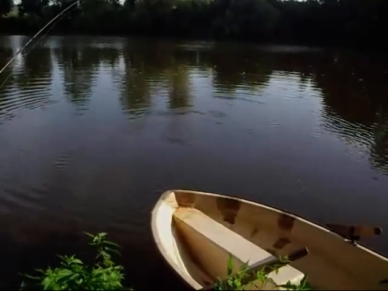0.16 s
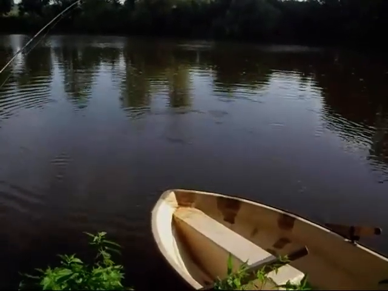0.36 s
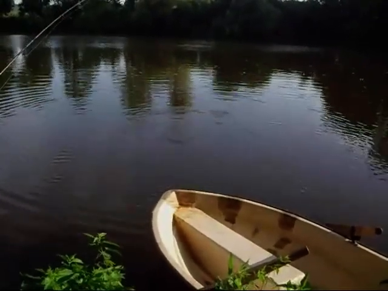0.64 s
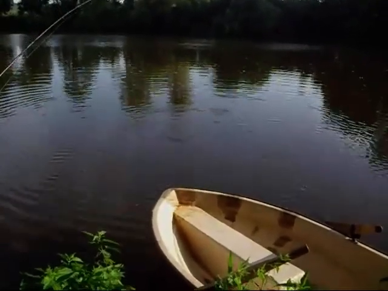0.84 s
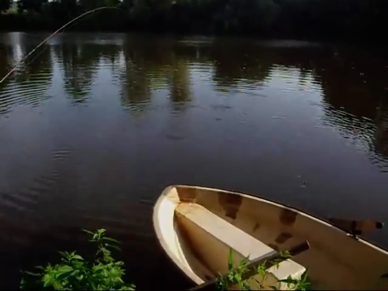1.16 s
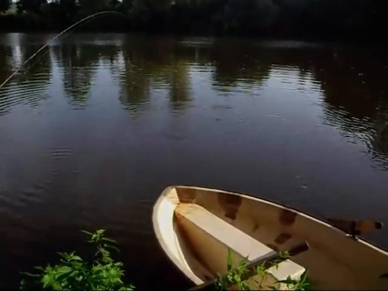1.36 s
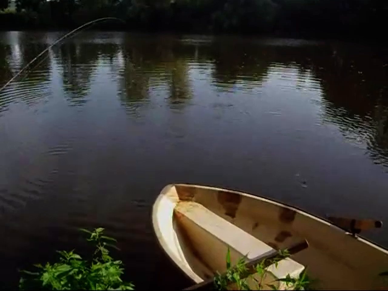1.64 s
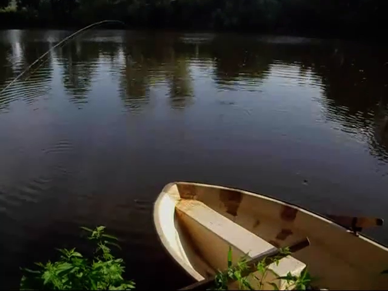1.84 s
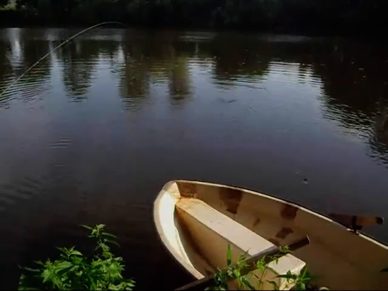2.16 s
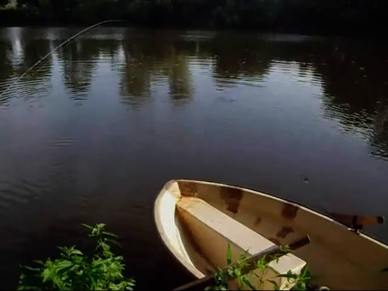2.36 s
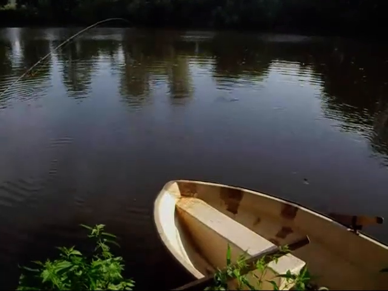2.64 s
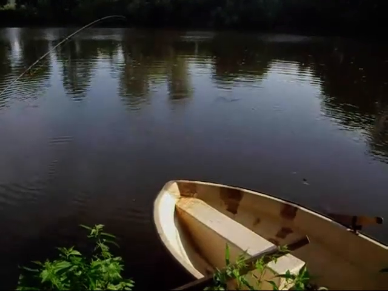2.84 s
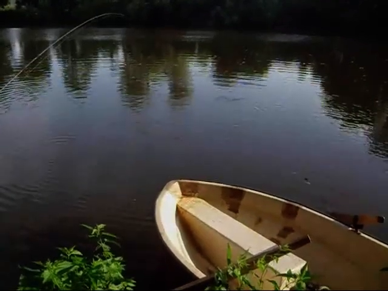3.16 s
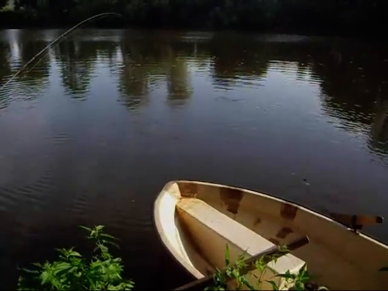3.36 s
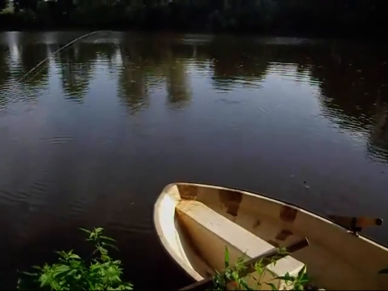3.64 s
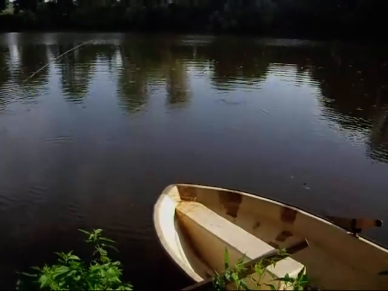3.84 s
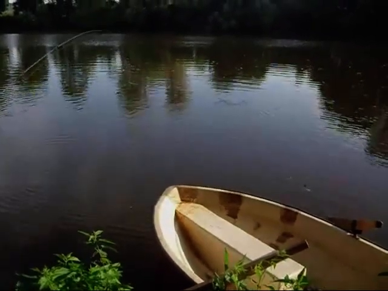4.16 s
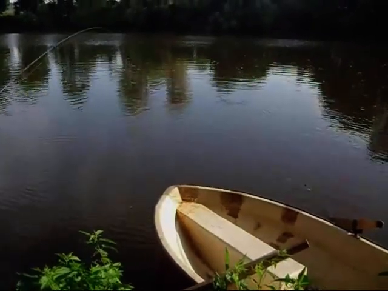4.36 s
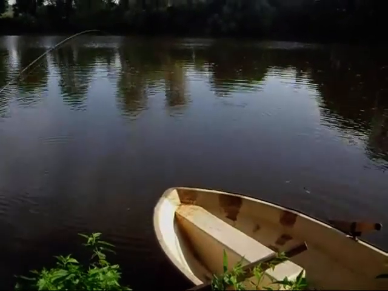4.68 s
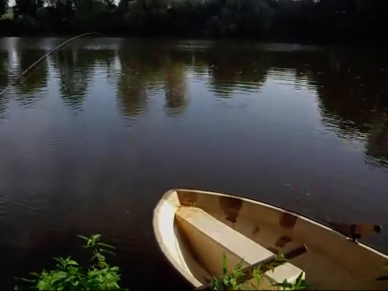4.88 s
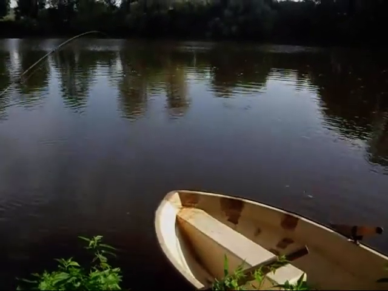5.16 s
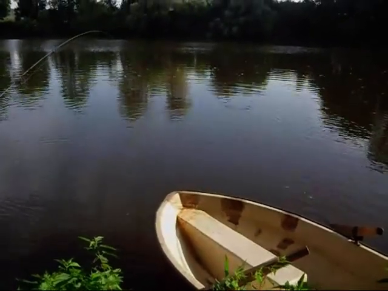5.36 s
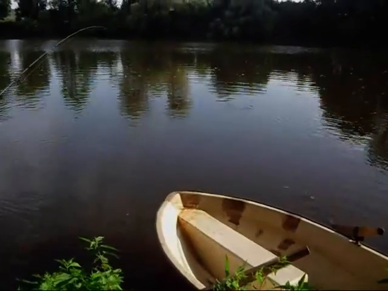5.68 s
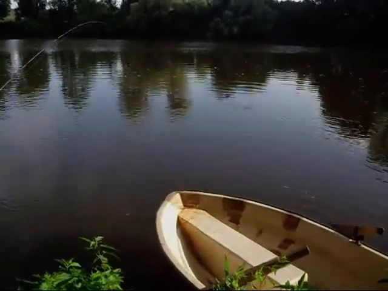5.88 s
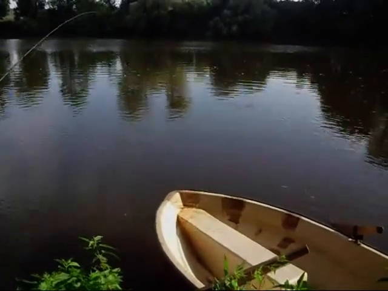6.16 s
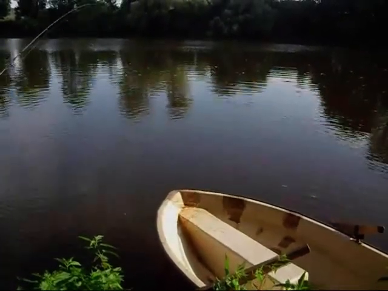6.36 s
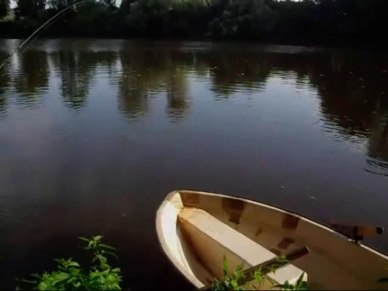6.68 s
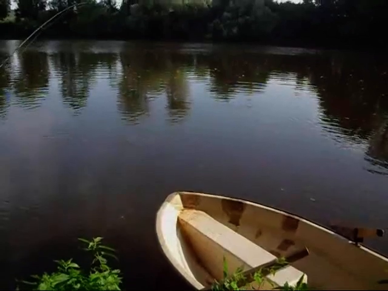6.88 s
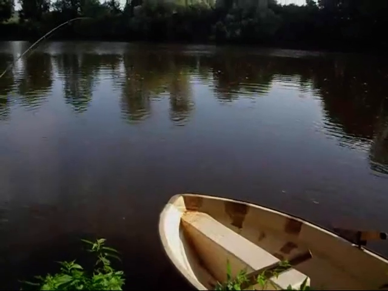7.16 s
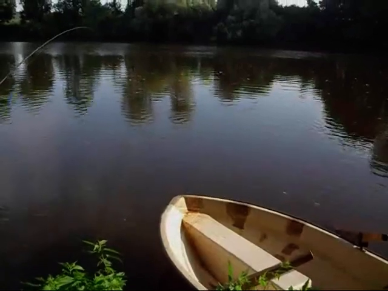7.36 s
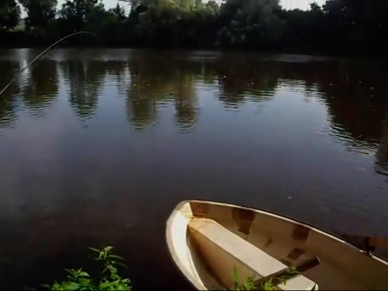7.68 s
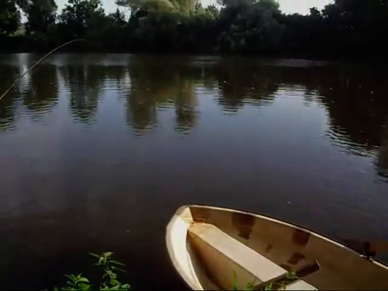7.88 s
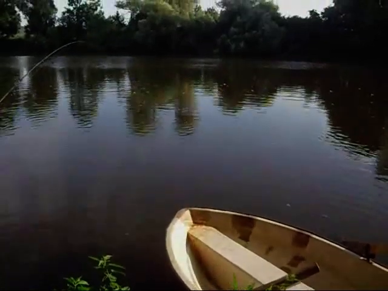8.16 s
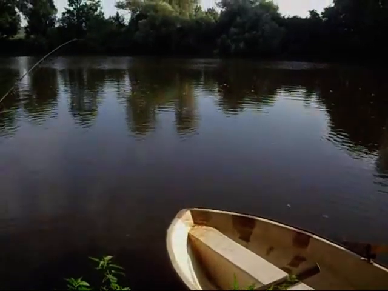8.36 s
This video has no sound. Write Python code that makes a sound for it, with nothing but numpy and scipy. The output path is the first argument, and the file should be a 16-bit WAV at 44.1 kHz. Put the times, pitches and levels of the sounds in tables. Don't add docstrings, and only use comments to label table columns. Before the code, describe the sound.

Sharp, bright ratchet teeth of a fishing reel snap and ring very briefly, recorded close in mono outdoors. The pace goes from slow single clicks to regular ticking, a pause of sparse clicks, a rapid zipping run, a gradual slowdown, more lone clicks, then another quick surge. Small line ticks and dry rod creaks accompany the early part. One quick, close echo and a short faint tail colour the clicks above smooth, low open air.

```python
import sys
import numpy as np
from scipy import signal
from scipy.fft import rfft, irfft, next_fast_len
from scipy.io import wavfile
from scipy.ndimage import uniform_filter1d

SR = 44100
rng = np.random.default_rng(int(sys.argv[2]) if len(sys.argv) > 2 else 0)


def wrap_up_sound(samples):
    columns = np.atleast_2d(samples).T
    tamed = np.clip(columns, -1, 1)
    steps = np.round(tamed * 32767).astype(np.int16)
    wavfile.write(sys.argv[1], SR, steps)


def attenuation_scalar(level_db):
    decades = np.asarray(level_db, float) / 20
    return 10 ** decades


N = 376173

# snap in dB, rebound in dB.
WHEEL_TEETH = [(-32.5, -17.5), (-16.5, -20), (-11, -22), (-12, -24), (-11, -44), (-14, -36), (-17.5, -42),
               (-19.5, -37), (-18, -38), (-19, -43), (-19.5, -32), (-20.5, -35), (-21, -27), (-22.5, -20),
               (-15, -36), (-12.5, -41.5), (-13, -47), (-13.5, -37), (-15.5, -65), (-17, -23), (-13.5, -33),
               (-17, -17.5), (-30, -17)]
# frequency in Hz, level in dB, t60 in seconds, swing in dB, facing tooth, beams a turn.
PAWL_MODES = [(10000, -24, 0.0058, 13, 25, 1), (9990, -0.5, 0.0067, 5, 22.6, 2),
              (10370, 0, 0.0059, 7, 5.73, 2), (10630, -4, 0.0078, 7, 9, 1),
              (11310, -11.5, 0.019, 5, 8.9, 1), (10900, -7.5, 0.0068, 12, 12.4, 1)]


def ratchet(count):
    # time in seconds, level in dB.
    pawl_aim = [(0, -4), (1, -2), (2, -1), (3, 1), (4, -0.5), (5, 1.5), (6, -0.5), (7, 1.5), (7.6, 0.8),
                (8.53, -.3)]
    snap_s = teeth()
    rim_db = rim_ring(snap_s)
    tooth = np.arange(len(snap_s)) + count
    aim_db = np.interp(snap_s, *np.transpose(pawl_aim))
    snap_db, rebound_db = aim_db + np.array(WHEEL_TEETH)[tooth % len(WHEEL_TEETH)].T

    turn = 2 * np.pi / len(WHEEL_TEETH)
    rebound_s = snap_s + 0.0023 + 0.00012 * np.cos(turn * (tooth - 21))
    out = add(np.zeros(N), snap_s, blow(tooth, snap_db - 0.7, rim_db + 0.36, body_db=4.0))
    add(out, rebound_s, blow(tooth, rebound_db - 0.7, rim_db - 8.0, body_db=-1.0))

    singing_db, singing_t60_s = -38, 0.053
    t = np.arange(1300) / SR
    for mode in PAWL_MODES[1:4]:
        add(out, rebound_s, struck(mode[0], singing_db + beam(mode, tooth), singing_t60_s, t))

    hiss_db, hiss_t60_s = -36.5, 0.067
    decay = attenuation_scalar(hiss_db - 60 * t / hiss_t60_s)
    shaking = add(np.zeros(N), snap_s, np.tile(decay, (len(snap_s), 1)))
    return out + shaking * rms_one(band(rng.standard_normal(N), 3270, 10600))


def teeth():
    creep = [0.1334, 0.4742, 0.697, 0.8271, 0.9358, 1.0272, 2.7469, 2.8406, 2.9632, 3.1136, 3.2465, 3.3433,
             3.4467, 5.6257, 5.7166, 5.8309, 5.9459, 6.0975, 6.3183, 6.6247, 6.8887, 6.9911, 7.07, 7.13]
    # time in seconds, spool speed in teeth per second.
    steady_pull = [(1.1096, 16.13), (1.347, 17.75), (1.385, 20.68), (1.762, 18.57), (1.936, 20.34),
                   (1.99, 17.41), (2.338, 19.3), (2.57, 18.67), (2.6713, 13.95)]
    bolt = [(3.5166, 25.23), (3.628, 27.97), (3.69, 40.91), (3.779, 62.36), (3.871, 89.49), (3.93, 95.13),
            (4.0, 103.03), (4.0835, 134.67)]
    tiring = [(4.0912, 132.39), (4.135, 121.19), (4.224, 81.44), (4.316, 82.15), (4.361, 73.59),
              (4.565, 57.05), (4.6, 60.78), (4.6849, 34.3)]
    second_wind = [(4.7158, 30.99), (4.879, 32.32), (4.903, 40.14), (5.097, 39.3), (5.126, 34.17),
                   (5.169, 38.6), (5.371, 18.33), (5.431, 15.9), (5.5482, 15.76)]
    dash = [(7.1935, 19.17), (7.302, 41.95), (7.362, 44.13), (7.535, 64.47), (7.589, 73.8), (7.736, 58.92),
            (7.802, 37.15), (7.9033, 23.03)]
    last_tugs = [(7.9446, 27.09), (8.067, 39.87), (8.086, 36.05), (8.267, 30.34), (8.312, 31.3),
                 (8.39, 43.08), (8.4986, 28.58)]
    times = [creep]
    for pull in (steady_pull, bolt, tiring, second_wind, dash, last_tugs):
        s, speed = np.transpose(pull)
        step_s = 0.0005
        t = np.arange(s[0], s[-1] + 0.004, step_s)
        turned = np.cumsum(np.interp(t, s, speed)) * step_s
        turned = turned - turned[0]
        times.append(np.interp(np.arange(int(turned[-1]) + 1), turned, t))
    return np.sort(np.concatenate(times))


def blow(tooth, level_db, rim_db, body_db):
    # frequency in Hz, level in dB, t60 in seconds, swing in dB, facing tooth, beams a turn.
    rim_modes = [(6230, -7, 0.02, 9.9, 11, 1), (6120, -9.5, 0.011, 12, 5.3, 2),
                 (6550, 0, 0.038, 1.7, 8.6, 1), (6763, 4.5, 0.018, 3.2, 1.3, 1)]
    body_modes = [(2520, -46, 0.009, 3, 5.5, 1), (3073, -36, 0.0089, 1.7, 6.2, 1),
                  (4390, -44, 0.012, 12.7, 24.7, 1), (4840, -39, 0.0083, 5.7, 12, 1),
                  (5200, -45, 0.01, 8.2, 12.4, 1), (7400, -29, 0.0087, 2.5, 1.7, 1),
                  (8920, -35.5, 0.016, 3, 11, 1), (12120, -30, 0.019, 1.6, 25.8, 2),
                  (12370, -33, 0.013, 4, 2.2, 1), (13400, -32, 0.0088, 2, 10, 1),
                  (14300, -31.5, 0.0063, 2.8, 10, 1)]
    crack_db, crack_t60_s = -31, 0.011
    t = np.arange(700) / SR
    crack = attenuation_scalar(crack_db + body_db - 60 * t / crack_t60_s)
    sharp = crack * rng.standard_normal((len(tooth), len(t)))
    for modes, strike_db in ((PAWL_MODES, level_db), (body_modes, body_db)):
        for mode in modes:
            sharp += struck(mode[0], strike_db + beam(mode, tooth), mode[2], t)
    sharp *= 1 - np.exp(-t / 0.0002)

    t = np.arange(1300) / SR
    ring = sum(struck(mode[0], rim_db + beam(mode, tooth), mode[2], t) for mode in rim_modes)
    ring = ring * (1 - np.exp(-t / 0.00046))
    ring[:, :700] += sharp
    return ring


def struck(hz, level_db, t60, t):
    spread = [0.008, 2, 1]
    luck = uniform_filter1d(rng.standard_normal((len(level_db), 3)), size=3, axis=0) * spread
    height = attenuation_scalar(level_db + luck[:, 1])[:, None]
    pitch = (hz * (1 + luck[:, 0]))[:, None]
    return height * attenuation_scalar(-60 * t / t60) * np.sin(2 * np.pi * pitch * t + luck[:, 2:])


def beam(mode, tooth):
    hz, db, t60, swing_db, facing, beams = mode
    return db + swing_db * np.cos(2 * np.pi * round(beams) * (tooth - facing) / len(WHEEL_TEETH))


def rim_ring(s):
    # time in seconds, ring in dB, once-a-turn swing in dB.
    rim_aim = [(0, -25, 3.5), (1, -27, 1), (2, -26.5, -0.5), (3.5, -25.5, -2), (4, -26, 5), (4.3, -24, 2.5),
               (4.6, -27.5, 1.5), (5, -25, 2), (5.3, -31, -2), (5.7, -29.5, 3), (6, -25, 0), (6.6, -26, 2),
               (7, -25, 5.5), (7.3, -31, -2.5), (7.6, -34, 1.6), (8, -28, 2.5), (8.53, -31.5, -1)]
    # lobes a turn, swing in dB, facing tooth.
    rim_lobes = [(2, 1.6, 22.15), (3, 0.8, 1.2), (4, 2.3, 3.7)]
    at, ring_db, swing_db = np.transpose(rim_aim)
    turn = 2 * np.pi / len(WHEEL_TEETH)
    tooth = np.arange(len(s))
    lobes = sum(db * np.cos(round(n) * turn * (tooth - facing)) for n, db, facing in rim_lobes)
    swing = np.interp(s, at, swing_db) * np.cos(turn * (tooth - 12))
    return np.interp(s, at, ring_db) + swing + lobes


def ticks():
    # start in seconds, peak in dB, tone in Hz.
    line_ticks = [
        (0.336, -26.5, 4200),
        (0.7267, -25, 3220),
        (1.784, -22.5, 4120),
        (5.467, -25, 6550),
    ]
    s, peak_db, hz = np.transpose(line_ticks)
    t = np.arange(400) / SR
    noise = band(rng.standard_normal((len(s), len(t))), 2300, 8200)
    edge = attenuation_scalar(peak_db[:, None] - 2 - 60 * t / 0.011) * noise
    return add(np.zeros(N), s, struck(hz, peak_db - 10, t60=0.0088, t=t) + edge * 2.5)


def creaks():
    # start in seconds, peak in dB, level of the lower wood tone in dB.
    rod_creaks = [(0.651, -34, -45), (0.703, -41, -40), (0.7245, -38, -39.5), (0.9043, -53, -41.5),
                  (1.1218, -32, -43), (1.2494, -49, -52), (1.3059, -37, -45), (1.3594, -42, -48),
                  (1.4775, -36, -47), (1.5144, -41, -48), (1.5743, -42, -43), (1.6176, -35, -41),
                  (1.7165, -41, -46), (1.8063, -33, -44), (1.8257, -34, -44), (1.9065, -33, -43),
                  (1.9989, -39, -42), (2.0414, -42, -47), (2.0956, -35, -45), (2.175, -38, -42),
                  (2.1974, -38, -41.5), (2.2393, -40, -47), (2.33, -42, -42), (2.4044, -42, -54),
                  (2.4848, -40, -44), (2.6044, -44, -52), (2.883, -42, -48), (3.078, -37, -46),
                  (3.211, -42, -45), (3.3594, -39, -45)]
    s, high_db, low_db = np.transpose(rod_creaks)
    t = np.arange(900) / SR
    swell = t / 0.0031 * np.exp(1 - t / 0.0045)
    high = add(np.zeros(N), s, attenuation_scalar(high_db[:, None] - 9) * swell)
    high *= rms_one(band(rng.standard_normal(N), 3990, 4350))
    low = add(np.zeros(N), s, attenuation_scalar(low_db[:, None] + 2) * swell)
    low *= rms_one(band(rng.standard_normal(N), 1400, 4050))
    return high + low


def riverbank(x, aside):
    # time in seconds, level in dB.
    echo_path = [(0, -18), (2, -13), (3.5, -10), (4.6, -13), (5.3, -10.5), (5.7, -8), (6, -7.5), (6.6, -2),
                 (7, -3), (7.3, -7.5), (7.6, -5), (8, -6.5), (8.53, -7)]
    echo_s, bank_db, bank_t60_s = 0.0092, -20, 0.12
    echo = np.pad(aside, (round(echo_s * SR), 0))[:N]
    echo_db = np.interp(np.arange(N) / SR, *np.transpose(echo_path))

    t = np.arange(4000) / SR
    scatter = rng.standard_normal(len(t)) * attenuation_scalar(-60 * t / bank_t60_s)
    tail = signal.fftconvolve(x, scatter / np.linalg.norm(scatter))[:N]
    return x + attenuation_scalar(echo_db) * echo + attenuation_scalar(bank_db) * tail


def air():
    # frequency in Hz, density in dB per Hz.
    air_colour = [(25, 2), (50, -1.5), (100, -6), (200, -10), (400, -16), (800, -23.5), (1600, -30.5),
                  (3200, -35), (6400, -39.5), (12000, -42), (16000, -43.5)]
    size = next_fast_len(N)
    hz = np.maximum(np.arange(size // 2 + 1) * SR / size, 1)
    at_hz, density_db = np.transpose(air_colour)
    colour = attenuation_scalar(np.interp(np.log(hz), np.log(at_hz), density_db))
    colour *= hz ** 2 / (hz ** 2 + 14 ** 2)
    rush = irfft(rfft(rng.standard_normal(size)) * colour, size)[:N]
    return attenuation_scalar(-27) * rms_one(rush)


def rms_one(x):
    return x / np.sqrt(np.mean(x ** 2) + 1e-20)


def band(x, low_hz, high_hz):
    return signal.sosfilt(signal.butter(2, [low_hz, high_hz], "band", fs=SR, output="sos"), x)


def add(out, times, sounds):
    for s, sound in zip(times, sounds):
        i = round(s * SR)
        out[i:i + len(sound)] += sound[:N - i]
    return out


def scene():
    near = ratchet(count=0) + ticks() + creaks()
    return (riverbank(near, aside=ratchet(count=1)) + air())[None]


def top_cut(x):
    return signal.sosfilt(signal.butter(12, 16650, fs=SR, output="sos"), x)


def record(dry):
    return top_cut(dry)


dry = scene()
out = record(dry)
wrap_up_sound(out)
```